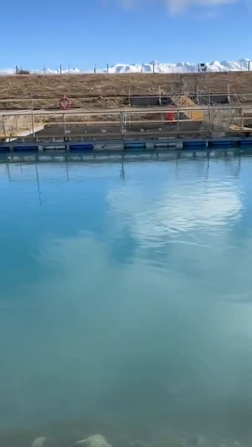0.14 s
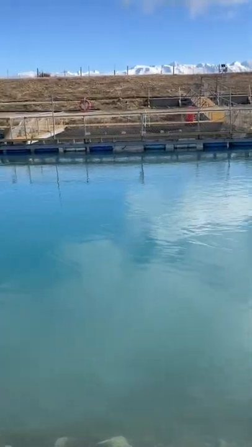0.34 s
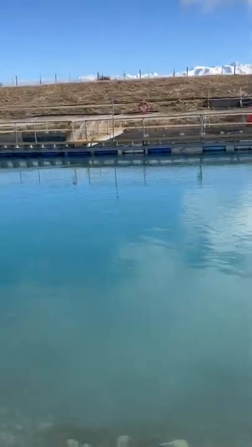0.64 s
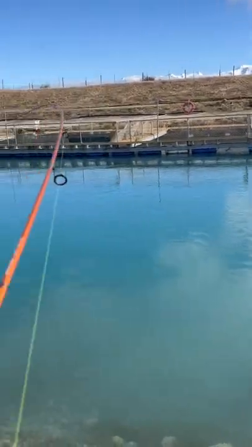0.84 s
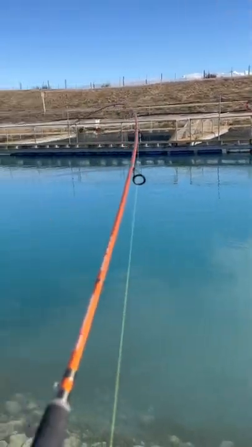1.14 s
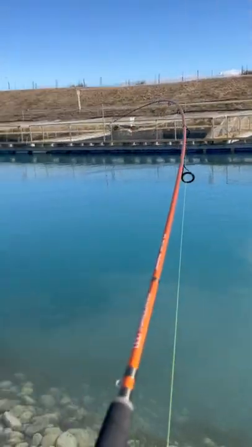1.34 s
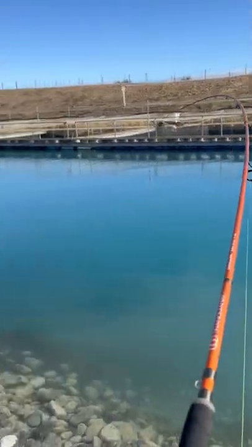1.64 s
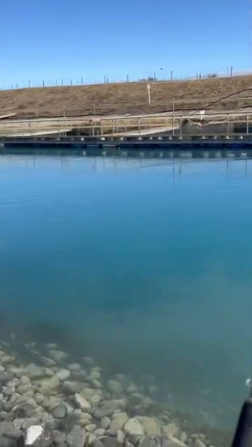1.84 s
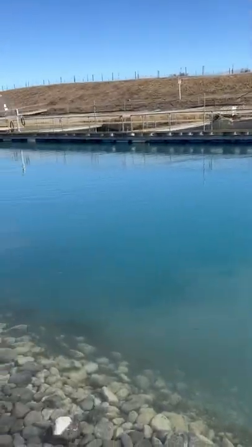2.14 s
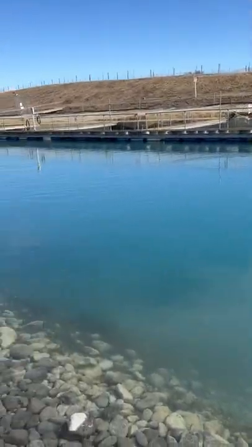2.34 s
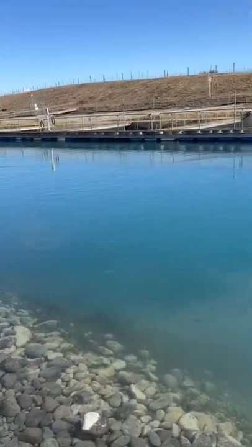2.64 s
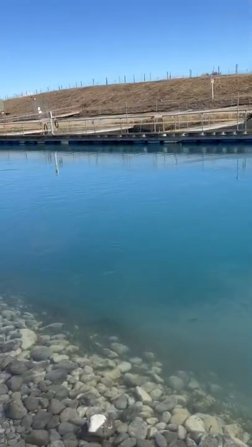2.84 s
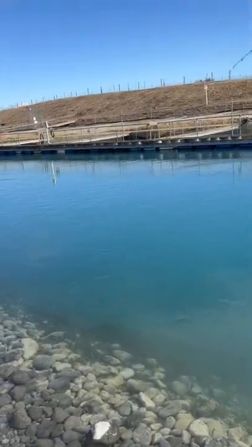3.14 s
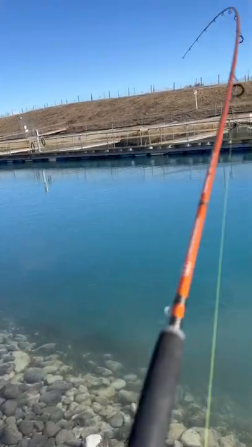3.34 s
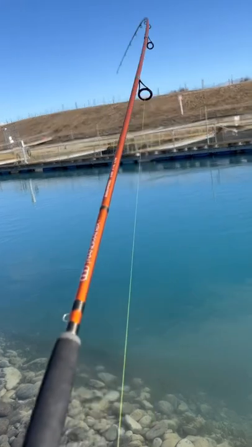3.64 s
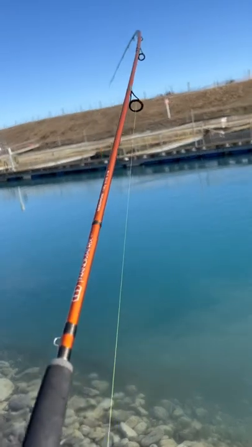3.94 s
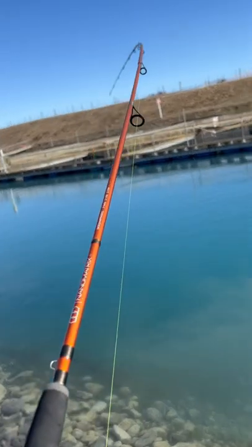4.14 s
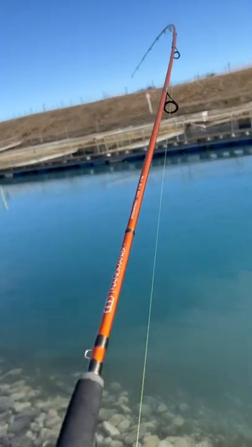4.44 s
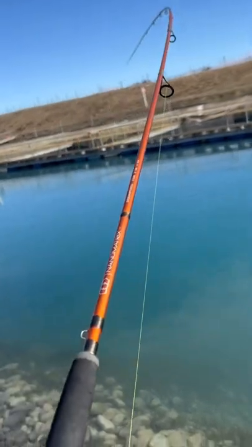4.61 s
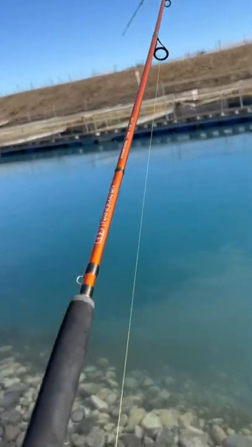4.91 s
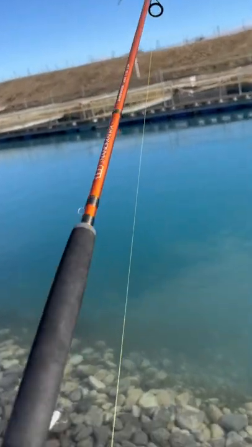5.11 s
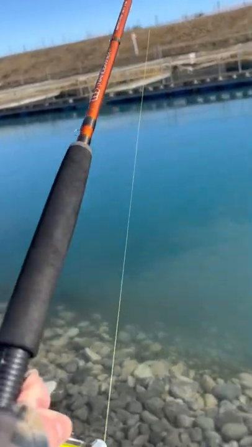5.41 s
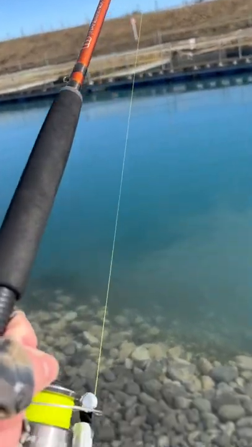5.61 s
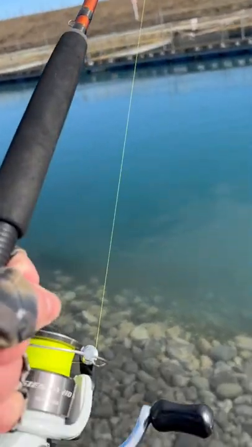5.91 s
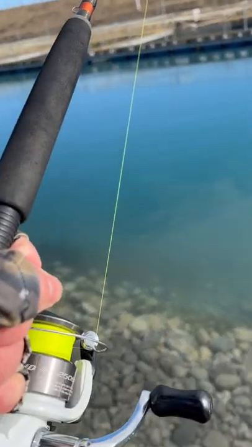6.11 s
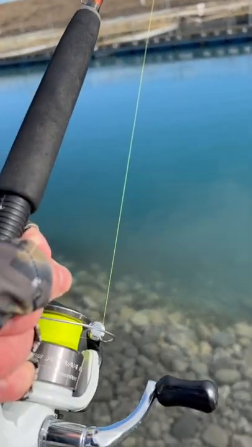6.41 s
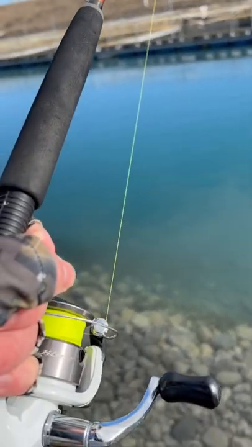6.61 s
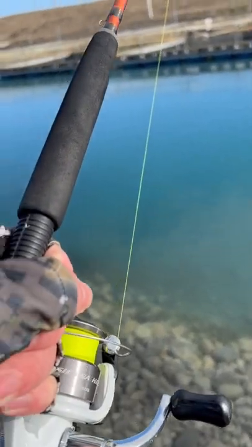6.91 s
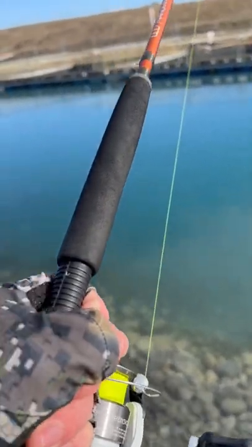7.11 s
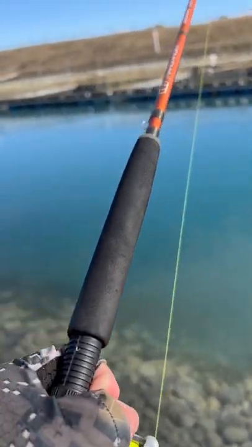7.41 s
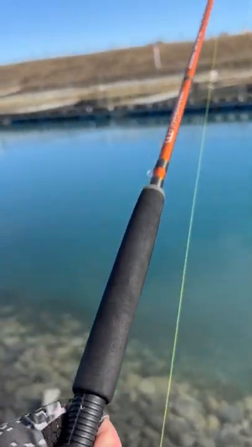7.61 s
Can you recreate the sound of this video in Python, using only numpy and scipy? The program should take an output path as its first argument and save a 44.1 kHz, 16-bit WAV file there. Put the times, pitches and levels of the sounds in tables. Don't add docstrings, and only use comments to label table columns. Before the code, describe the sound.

Close, dry, high-pitched reel clicks whirr rapidly, dip and quicken again, then thin into a slower, louder ratchet over faint open air.

```python
import sys
import numpy as np
from scipy import signal
from scipy.io import wavfile
from scipy.ndimage import uniform_filter1d

SR = 44100
rng = np.random.default_rng(int(sys.argv[2]) if len(sys.argv) > 2 else 0)


def materialize(psi):
    bounded = np.clip(np.atleast_2d(psi).T, -1, 1)
    quanta = np.round(bounded * 32767).astype(np.int16)
    wavfile.write(sys.argv[1], SR, quanta)


def attenuation_scalar(level_db):
    decades = np.asarray(level_db, float) / 20
    return 10 ** decades


N = 342061
EAR = np.array([[1], [-1]])
TEETH, LAST_TOOTH = 18, 372

# start_s, snap_level_db, treble_tilt_db_per_octave, rim_ring_db, washer_pressure_db
HOLD = [(0, -33, 3, -13, -9), (.5, -31.5, 2, -10.5, -7), (.65, -33.5, 1, -6.5, -2),
        (1.2, -32.5, 1.5, -3, -1), (1.6, -33.5, 2.2, -4, 1), (2.1, -33, 0.8, -4, 2.5),
        (2.6, -33.5, 1.2, -1.5, 2.5), (3.1, -35.5, -1.7, 4, 3), (3.6, -35, 0.3, -1, 3.5),
        (4.1, -35, 1.5, -4, 0), (4.6, -35, 0, -5, -2), (4.95, -34, -0.3, -2.5, 2.7),
        (5.3, -29, 1.6, -3, 4.5), (5.8, -27, 1.4, -2, 0.5), (6.3, -27.5, 0.9, -6.5, 1),
        (6.8, -30, 0.9, 0, -3.5), (7.3, -30.5, 0.6, 0.3, 2), (7.76, -38, 0, 9.5, 0.5)]
# pitch_hz, level_db, once_a_turn_swing_db, once_phase_rad,
# twice_a_turn_swing_db, twice_phase_rad
SHELL = [(1414, -33, 0.5, -4.5, 12, 1.3), (2140, -25.5, 1, 1, 10.5, -3), (3133, -17.5, 7, -1.35, 1.9, 4),
         (4160, -25, 7.5, -1.2, 6.5, 4.5), (5220, -17, 7, -2.5, 3.5, -4.9), (6586, -15, 3, -0.2, 7.5, -3),
         (8030, -10, 3, 0.8, 4, -0.37), (9160, -11.5, 4.5, -2, 3, 0.9), (10520, -11, 3.1, -2.5, -0.5, 8.2),
         (11150, -24, 3.5, 1.5, 2, -11), (12370, -10.5, 3.5, 1.5, -1, -19), (14640, -9, 2, 1.8, -0.5, -3.5),
         (15300, -20.5, -5.5, -12, 12, -0.5)]
# start_s, gain_of_3khz_side_db (the 5.4 kHz side loses a share of it)
SHADE = [
    (0, 5),
    (1.6, 2.5),
    (2.1, -5.5),
    (3.2, -1.5),
    (4.6, 3),
    (5.3, -2.5),
    (6.1, -3),
    (6.8, -3),
    (7.76, 1.2),
]
RIM_HZ = [1355, 4672, 4710, 7650, 9950, 12950, 14850, 15010]
# level_db, t60_s, lobes_round_rim, phase_rad
RIM = [(-28.5, 0.036, 2, 1.94), (-35, 0.72, 2, 0.099), (-24, 0.25, 2, 0.82), (-33.5, 0.045, 2, 0.25),
       (-18, 0.027, 6.7, 0.15), (-22, 0.018, 1, 3.3), (-15.5, 0.035, 1.3, 0.74), (-24, 0.041, 2.3, 0.71)]


def snaps():
    when_s = tooth_times() - .0005
    count = len(when_s)
    angle_flat = 2 * np.pi * np.arange(count) / TEETH
    angle = angle_flat[:, None, None]
    level_db, tilt_db, ring_db = (c[:, None, None] for c in curve_at(HOLD, when_s)[:3])
    hz, shell_db, once_db, once_rad, twice_db, twice_rad = np.transpose(SHELL)
    turn_rad = 2 * np.pi * rng.random((4, len(hz)))
    chance = np.clip(rng.standard_normal((count, 4, len(hz))), -2, 2)

    swing_db = 0.58 * (once_db * np.cos(angle + once_rad) + twice_db * np.cos(2 * angle + twice_rad))
    arms_db = np.cos(2 * angle + 0.12)
    mode_db = level_db + 15.5 + arms_db + shell_db + swing_db + tilt_db * np.log2(hz / 8000)
    mode_db = mode_db + 1.83 * chance[:, :1] + EAR * 0.33 * chance[:, 1:2]
    wrist_db = curve_at(SHADE, when_s)[0]
    offset_db, opposite_share = -1.5, 0.99
    facing_s, facing_lasts_s, facing_db = 5.7, 0.66, 5.5
    top_db = facing_db / (1 + np.exp((facing_s - when_s) / facing_lasts_s))
    shades = ((3100, offset_db + wrist_db), (5400, offset_db - opposite_share * wrist_db), (12900, top_db))
    for centre_hz, shade_db in shades:
        mode_db += shade_db[:, None, None] * np.exp(-(np.log2(hz / centre_hz) / .3) ** 2)

    slide = 1 + .04 * np.sin(angle + turn_rad[0]) + .005 * chance[:, 2:3] + 0 * EAR
    phase = turn_rad[1] + 1.5 * np.sin(angle + turn_rad[2]) + .15 * chance[:, 2:3] + EAR * .12 * chance[:, 3:]
    grains = crack(hz * slide, mode_db, phase, rise_s=.0003, t60_s=.0032, size=320)
    out = np.zeros((2, N))
    add(out, when_s, grains)
    body_delay_s = .00065 + .0002 * np.sin(angle_flat + 1.3)
    add(out, when_s + body_delay_s, attenuation_scalar(-9) * grains)

    for rim_hz, (rim_db, t60_s, lobes, place_rad) in zip(RIM_HZ, RIM):
        lobe = np.cos(lobes * angle + place_rad) + .5
        lobe = lobe + 0.66 * rng.uniform(-2.59, 1, (count, 1, 1))
        lobe = lobe + EAR * 0.15 * rng.standard_normal((count, 1, 1))
        blows = np.zeros((2, N))
        add(blows, when_s + 0.00038, attenuation_scalar(level_db + 5 + rim_db + ring_db) * lobe)
        out += ring(blows, rim_hz, t60_s)
    return out


# start_s, grip_lag_sine_ms, grip_lag_cosine_ms, nod_lag_sine_ms, nod_lag_cosine_ms
TURNS = [(0.0274, -12.8, 16.2, 13.3, -27.9), (0.2794, 10.3, -9.4, -16.0, -2.5),
         (0.5394, 21.1, 30.1, 6.5, 7.9), (0.7373, 3.1, -10.7, 6.9, 0.4), (0.8922, 6.1, 8.5, 1.2, -1.8),
         (1.0524, 6.8, -5.3, -1.3, -2.2), (1.2274, 9.1, -0.0, -4.3, 1.5), (1.4674, -11.3, 9.2, 1.3, 9.7),
         (1.8586, 30.5, 28.3, 19.8, -7.5), (2.1219, -30.3, -5.7, -3.0, -15.8),
         (2.3327, 21.8, 12.8, -12.6, -1.1), (2.5446, -10.4, -1.8, -1.4, 7.0),
         (2.8401, 6.8, 16.4, 5.4, -0.5), (3.3682, 2.9, 46.9, -7.6, 2.4), (3.799, 21.9, -11.2, -10.4, 3.5),
         (4.1124, -1.9, 7.2, 1.3, 4.2), (4.4157, 7.4, 6.2, 3.4, 0.2), (4.8262, 15.9, -0.9, -6.0, -2.9),
         (5.3463, -13.4, 14.3, -5.6, 4.8), (6.2132, 47.3, 19.1, 3.2, 16.5),
         (7.2067, -18.2, -19.1, 12.7, 3.2), (7.9884, -5.9, 14.6, 3.1, -36.9)]


def tooth_times():
    nods_per_turn = 1.7
    tooth = np.arange(LAST_TOOTH + 1.)
    first_tooth = TEETH * np.arange(len(TURNS))
    smooth_s, *lags_ms = (smooth_at(tooth, first_tooth, c) for c in np.transpose(TURNS))
    angle = 2 * np.pi * tooth / TEETH
    nod = nods_per_turn * angle
    waves = np.sin(angle), np.cos(angle), np.sin(nod), np.cos(nod)
    return smooth_s + sum(lag * wave for lag, wave in zip(lags_ms, waves)) / 1000


def speed(lag_s=0.):
    when_s = tooth_times()
    middle_s = (when_s[1:] + when_s[:-1]) / 2
    return np.interp(np.arange(N) / SR - lag_s, middle_s, 1 / np.diff(when_s))


def doublings():
    smoothing_s = 0.063
    return uniform_filter1d(np.log2(speed() / 70), int(smoothing_s * SR))


# start_s, level_db
TICKS = [(1.3205, -42), (2.9162, -35), (2.9647, -38), (3.0497, -37), (3.1027, -39), (3.1847, -37),
         (3.2404, -35), (3.3149, -38), (3.382, -42), (3.4503, -36), (3.882, -29.5), (3.9734, -31),
         (4.0033, -33), (4.0441, -33), (4.067, -33), (5.1387, -35), (5.171, -30), (5.467, -35),
         (5.5112, -37), (5.5774, -38), (5.6216, -39), (5.7452, -35), (5.878, -37), (5.929, -43),
         (5.9687, -33.5), (6.0724, -34), (6.24, -32), (6.2559, -48), (6.3498, -39), (7.3586, -40)]


def ticks():
    faint_count, from_tooth, to_tooth = 40, 30, 340
    faint_db, faint_spread_db = -45, 3.5
    place, luck = rng.random((faint_count, 2)).T
    tooth = from_tooth + place * (to_tooth - from_tooth)
    faint_s = np.interp(tooth, np.arange(LAST_TOOTH + 1), tooth_times())
    faint = faint_s, faint_db + faint_spread_db * (4 * luck - 2)
    start_s, level_db = np.hstack([np.transpose(TICKS), faint])

    mode_hz = np.array([2700, 3930, 5960, 7780, 8160, 9800, 11700, 12800, 14200])
    mode_db = np.array([-22, -20, -12, 0, -4, -7, -5, -6, -12])
    chance = rng.standard_normal((len(start_s), 4, len(mode_hz)))
    hz = mode_hz * (1 + .02 * chance[:, :1]) + np.zeros((2, 1))
    db = level_db[:, None, None] - 3 + mode_db + 2.5 * chance[:, 1:3]
    out = np.zeros((2, N))
    add(out, start_s - .0005, crack(hz, db, 3 * chance[:, 3:], rise_s=.0002, t60_s=.006))

    rattle_ring_hz, rattle_ring_db, rattle_ring_t60_s = 7660, -16.5, 0.047
    blow = attenuation_scalar(level_db + rattle_ring_db + 3 * chance[:, 0, 0])
    blows = np.zeros((2, N))
    add(blows, start_s, blow[:, None, None] * np.ones((2, 1)))
    return out + ring(blows, rattle_ring_hz, rattle_ring_t60_s)


# pitch_hz, width_hz, level_db
WHIRR = [(358, 24, -16.5), (809, 87, -3.5), (979, 16.5, -10), (1158.5, 50, 1.16), (1430, 87, -6),
         (1615, 47, -9), (2042, 290, -2), (2520, 250, -5.5), (3250, 690, -5)]


def washer_whirr():
    level_db, db_per_doubling, left_db = -62.5, 6.5, -0.75
    rub_db = level_db + db_per_doubling * doublings() + curve(HOLD)[3]
    whirr = sum(attenuation_scalar(db + 2.76 * walk(14)) * band(hz, width_hz, like=.92) for hz, width_hz, db in WHIRR)
    return attenuation_scalar(rub_db + left_db * EAR) * whirr


def line_hiss():
    level_db, db_per_doubling, pressure_share, grain_db = -60, 9.5, 0.15, 5.5
    hiss_db = level_db + db_per_doubling * doublings() + pressure_share * curve(HOLD)[3]
    hiss = band(7970, 4800, 0.69)
    hiss = hiss + attenuation_scalar(-19) * band(19000, 5000, 0.36)
    hiss = hiss + attenuation_scalar(-10) * band(14850, 66, 1.0)
    return attenuation_scalar(hiss_db) * attenuation_scalar(grain_db * walk(300)) * hiss


# pitch_hz, width_hz, level_db
ROLLER_ARM = [(206, 54, -5.5), (352, 52, 0.5), (527, 110, -7.5), (733, 91, 11)]


def roller():
    hz_per_tooth_rate, lag_s = 5.15, .014
    level_db, db_per_doubling, pressure_share = -65.5, 4, 0.67
    hz = hz_per_tooth_rate * speed(lag_s) * (1 + 0.0296 * walk(60))
    arm = attenuation_scalar(-6.0) + sum(attenuation_scalar(db) / (1 + (2 * (hz - f) / width_hz) ** 2) for f, width_hz, db in ROLLER_ARM)
    phase = 2 * np.pi * np.cumsum(hz) / SR
    whine = np.sin(phase + .45 * EAR) + attenuation_scalar(-6.0) * np.sin(2 * phase)
    whine_db = level_db + db_per_doubling * doublings() + pressure_share * curve(HOLD)[3]
    return attenuation_scalar(whine_db + 3.8 * walk(25.15)) * arm * whine


# start_s, level_db, start_hz, end_hz, length_s
GRIP = [
    (1.722, -51, 393, 247, 0.06),
    (1.76, -56, 500, 298, .04),
    (4.9, -56, 200.4, 197, 0.35),
    (5.58, -54, 720, 600, 0.015),
    (5.834, -51.5, 600, 553, .012),
    (5.872, -41.5, 950, 248, 0.017),
    (5.878, -38, 1730, 1480, 0.0019),
    (5.919, -54, 700, 200, 0.015),
    (6.13, -52, 600, 595, 0.04),
    (7.468, -59, 307, 250, 0.024),
]


def grip():
    return glides(GRIP, left_db=0.5)


# start_s, level_db, start_hz, end_hz, length_s
PUFFS = [
    (.04, -50, 50.5, 40, .07),
    (.16, -50, 55.6, 44.8, 0.1),
    (.38, -33.5, 65, 44.3, 0.07),
    (.445, -35, 55, 44.7, 0.051),
    (.488, -33, 55, 50, 0.06),
    (.535, -36, 60, 50, .045),
    (1.88, -37, 60, 45, 0.071),
    (1.925, -33, 71, 45, 0.038),
]
# centre_s, level_db, half_length_s
GUSTS = [(.02, -58, .15), (.5, -44.5, 0.13), (.84, -54, 0.15), (1.25, -52, 0.18), (1.64, -51.5, 0.043),
         (1.91, -46, 0.085), (2.29, -62, 0.098), (2.5, -62, 0.14), (2.95, -53, .07), (3.1, -53, .06),
         (3.37, -63, 0.043), (3.72, -60, .1), (4.2, -71, 0.37), (4.85, -58, 0.12), (5.9, -53, 0.062),
         (6.55, -72, .15)]


def wind():
    breeze = attenuation_scalar(-62.5 + 1.1 * walk(5.94))
    rumble = band(49.6, 24.5, 1.0) + attenuation_scalar(2.5) * band(81.0, 29.0, 1.0)
    return glides(PUFFS, left_db=.3) + attenuation_scalar(-6.0) * np.hypot(swells(GUSTS), breeze) * rumble


# centre_s, level_db, half_length_s
SLEEVE = [
    (1.72, -55, 0.075),
    (3.45, -65, 0.32),
    (4.4, -66, 0.58),
    (5.5, -69, 0.21),
    (5.89, -55, 0.035),
    (6.15, -66, 0.22),
    (7.52, -68.5, 0.19),
]


def rustle():
    level_db, db_per_doubling = -66.5, 3.5
    shaken = attenuation_scalar(level_db + db_per_doubling * doublings())
    cloth = band(193, 80.5, 0.96)
    cloth = cloth + attenuation_scalar(-7.0) * band(255, 138, 0.24)
    cloth = cloth + attenuation_scalar(-3) * band(698, 350, 0.086)
    return np.hypot(swells(SLEEVE), shaken) * cloth


def pump():
    return attenuation_scalar(-62.5 + 2.0 * walk(2.52)) * band(126.0, 12.4, 0.96)


# pitch_hz, level_db_per_hz
AIR = [(100, -21), (440, -38), (1340, -17), (3900, -14), (7300, -17.5), (12000, -16), (15600, -21),
       (16500, -35)]


def water_air():
    hz, level_db = np.transpose(AIR)
    air = np.zeros((2, N))
    for centre_hz in 100 * 2 ** np.arange(0, 7.4, .5):
        db = np.interp(np.log(centre_hz), np.log(hz), level_db) + 2.5 * walk(12)
        air += attenuation_scalar(db) * np.sqrt(centre_hz) * band(centre_hz, centre_hz / 4, .7)
    return attenuation_scalar(-76.5) * air / air.std()


def curve(table):
    s, *columns = np.transpose(table)
    return [np.interp(np.arange(N) / SR, s, c) for c in columns]


def curve_at(table, when_s):
    return [c[(when_s * SR).astype(int)] for c in curve(table)]


def smooth_at(q, xs, ys):
    slope = np.gradient(ys, xs)
    j = np.clip(np.searchsorted(xs, q) - 1, 0, len(xs) - 2)
    h, rise = np.diff(xs)[j], np.diff(ys)[j]
    u = (q - xs[j]) / h
    bend = (1 - u) * (slope[j] * h - rise) - u * (slope[j + 1] * h - rise)
    return ys[j] + u * rise + u * (1 - u) * bend


def add(out, start_s, grains):
    for start, grain in zip((np.asarray(start_s) * SR).astype(int), grains):
        out[:, start:start + grain.shape[-1]] += grain[:, :N - start]


def crack(hz, db, phase, rise_s, t60_s, size=500):
    t = np.arange(size) / SR
    hz = hz[..., None]
    slowed = t * (hz / 8000) ** .3
    shape = (1 - np.exp(-(slowed / rise_s) ** 2)) * np.exp(-np.log(1000) * slowed / t60_s)
    waves = shape * np.sin(2 * np.pi * hz * t + phase[..., None])
    return np.einsum("ecm,ecmt->ect", attenuation_scalar(db), waves)


def ring(blows, hz, t60_s):
    pole = np.exp(2j * np.pi * hz / SR - np.log(1000) / (t60_s * SR))
    return signal.lfilter([1], [1, -pole], blows).imag


def band(hz, width_hz, like):
    peak = signal.iirpeak(hz, hz / (1.74 * width_hz), SR)
    noise = rng.standard_normal((2, N))
    mid, side = signal.lfilter(*peak, signal.lfilter(*peak, noise))
    stereo = np.sqrt(1 + like) * mid + np.sqrt(1 - like) * side * EAR
    return stereo / np.sqrt(2) / mid.std()


def walk(rate_hz):
    k = int(SR / rate_hz)
    steps = np.repeat(rng.standard_normal(N // k + 1), k)
    w = uniform_filter1d(uniform_filter1d(steps, k), k)[:N]
    return w / w.std()


def glides(table, left_db):
    out = np.zeros((2, N))
    for start_s, level_db, start_hz, end_hz, length_s in table:
        u = np.linspace(0, 1, int(length_s * SR))
        hz = start_hz * (end_hz / start_hz) ** u
        wave = np.sin(2 * np.pi * np.cumsum(hz) / SR) * np.sin(np.pi * u ** 0.25)
        add(out, [start_s], [attenuation_scalar(level_db + left_db * EAR) * wave])
    return out


def swells(table):
    t = np.arange(N) / SR
    return np.sqrt(sum(attenuation_scalar(2 * db) * np.exp(-2 * ((t - s) / half_s) ** 2) for s, db, half_s in table))


def scene():
    reel = snaps() + ticks()
    t = np.arange(3000) / SR
    haze = rng.standard_normal((2, len(t))) * np.exp(-np.log(1000) * t / 0.02) * (t > .002)
    scatter = attenuation_scalar(-60) * signal.fftconvolve(reel, haze, axes=1)[:, :N]
    rubbing = washer_whirr() + line_hiss() + roller()
    outdoors = wind() + rustle() + pump() + water_air()
    return reel + scatter + rubbing + grip() + outdoors


def band_limit(x):
    return signal.sosfilt(signal.butter(12, 17030, fs=SR, output="sos"), x)


def record(dry):
    no_bass = signal.sosfilt(signal.butter(3, 32, "high", fs=SR, output="sos"), dry)
    mix = signal.sosfilt(signal.butter(14, 16200, fs=SR, output="sos"), no_bass)
    return band_limit(mix)


dry = scene()
out = record(dry)
materialize(out)
```